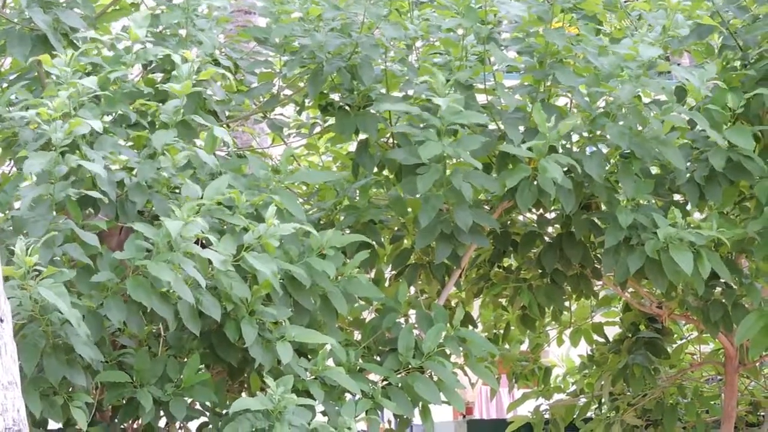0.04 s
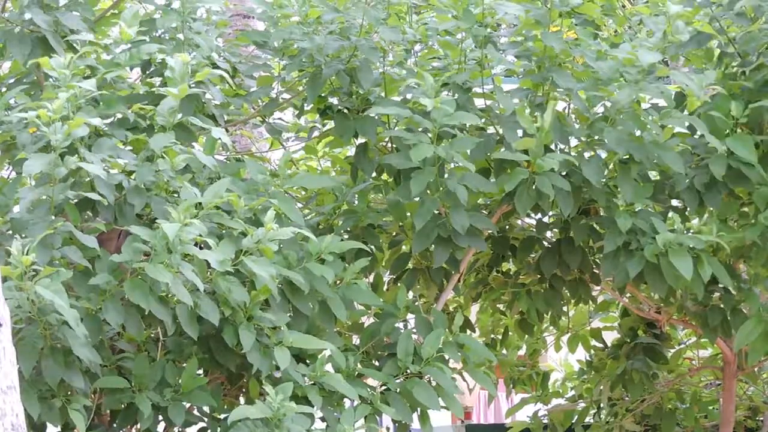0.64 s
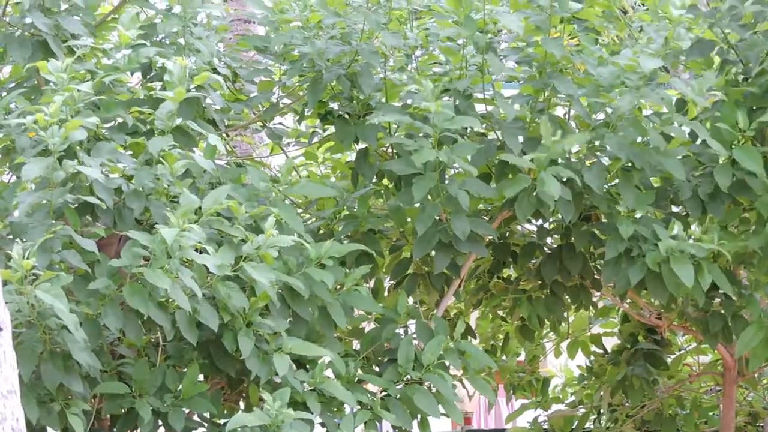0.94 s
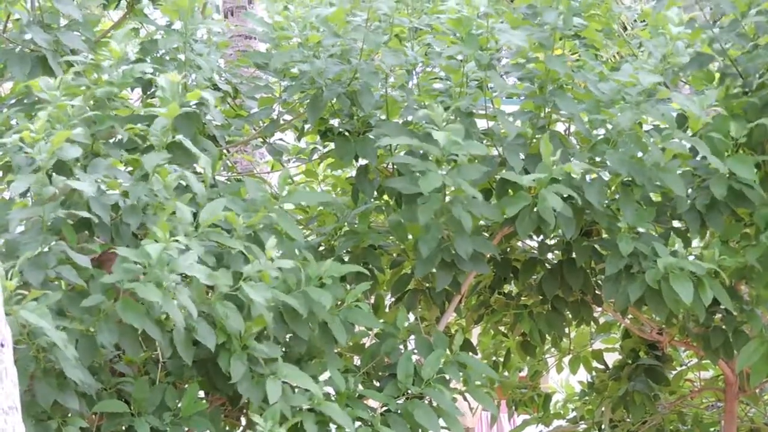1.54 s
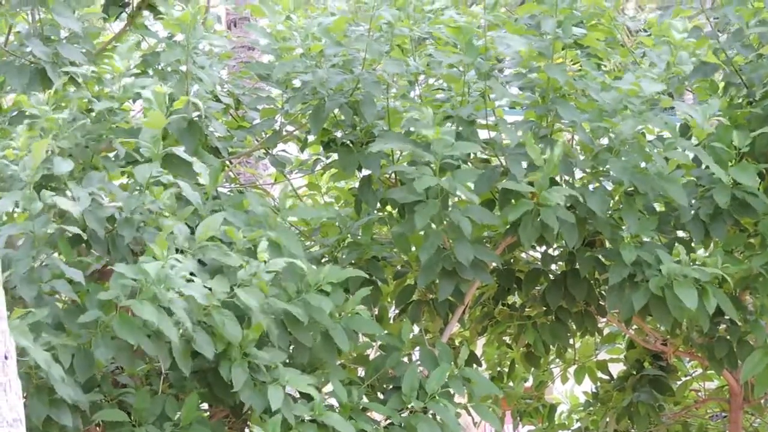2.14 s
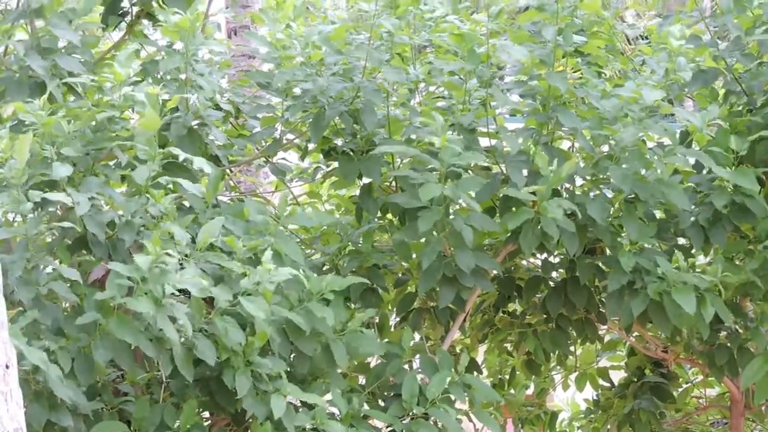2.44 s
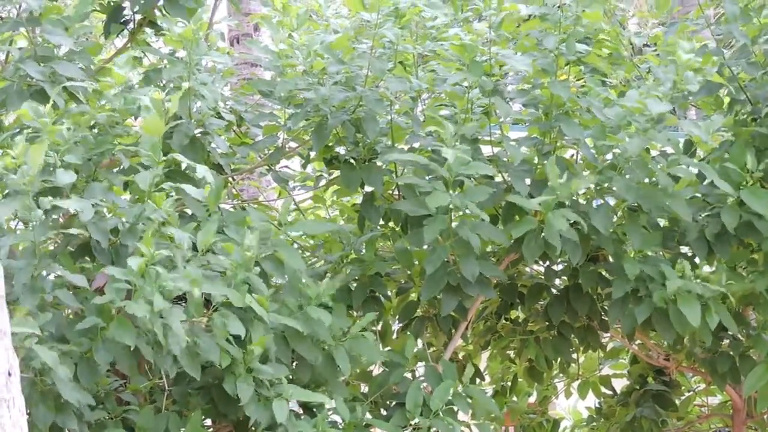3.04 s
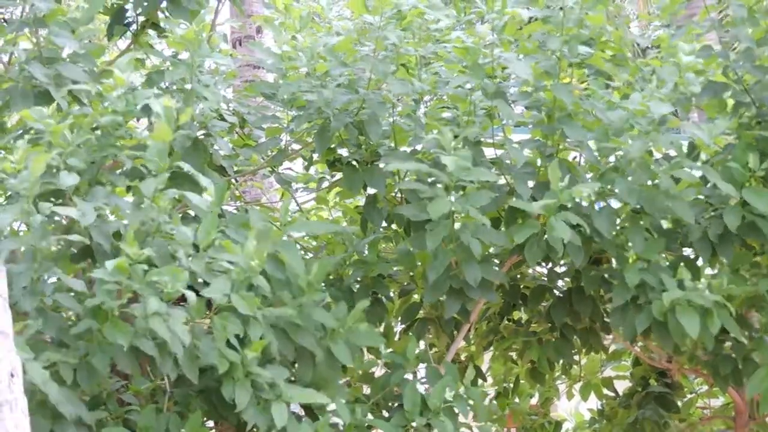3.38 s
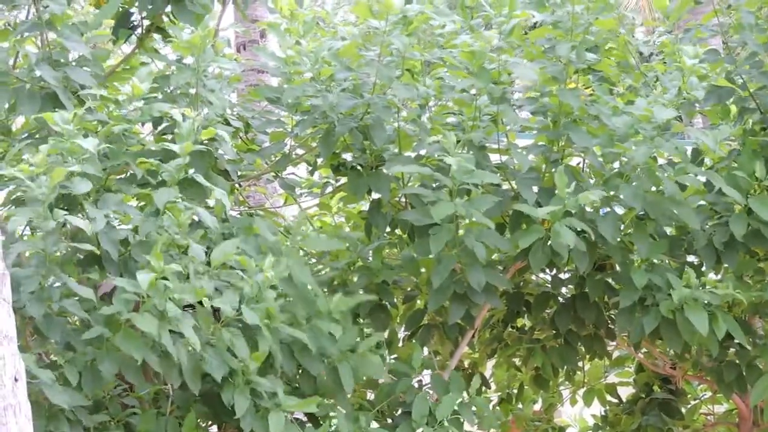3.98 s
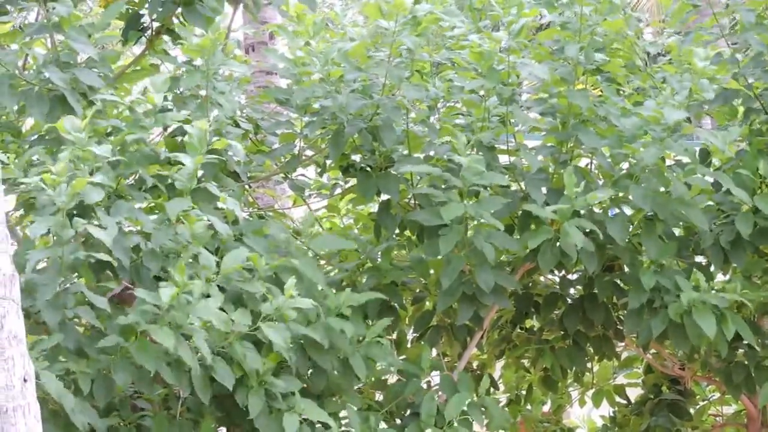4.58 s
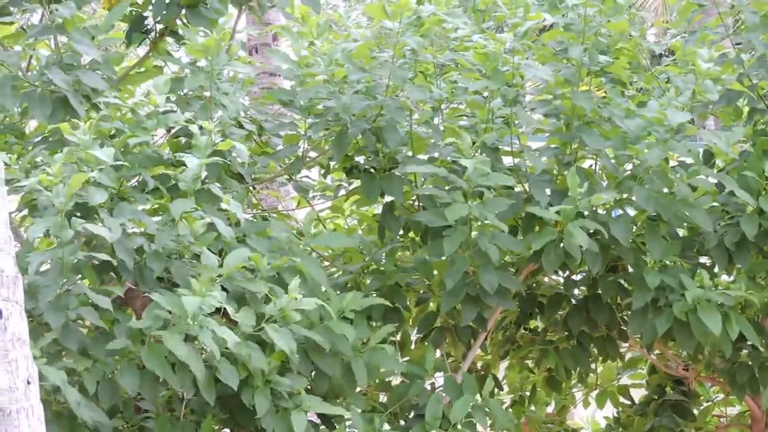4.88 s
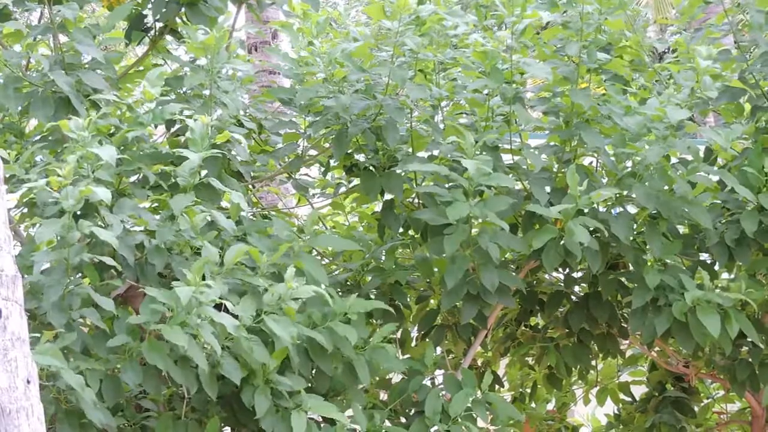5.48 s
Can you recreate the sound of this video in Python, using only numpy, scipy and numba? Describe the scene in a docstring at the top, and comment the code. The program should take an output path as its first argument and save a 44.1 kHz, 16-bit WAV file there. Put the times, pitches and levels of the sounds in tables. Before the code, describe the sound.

In a leafy garden, a soft wash of open air lies under uneven gusts that strike the microphone and build toward hard thumps. Thin, faint chirps and warbles come from the trees, followed by a short rustle of leaves and a few tiny twig taps. A soft whistling call repeats about four times a second, and a closer raspy squawk just begins as the sound ends.

```python
"""Gusts and birds in a garden

The microphone stands among shrubs. Turbulence rumbles on its two ports and single eddies thump them.
Leaves hiss and twigs tap in the breeze, over a steady wash of distant foliage and open air.
Small birds chirp and whistle in the trees, their calls scattered by trunks, leaves and walls.
At the very end a nearer bird starts a rasping squawk."""
import sys
import numpy as np
from scipy import signal
from scipy.fft import rfft, irfft
from scipy.io import wavfile
from scipy.ndimage import uniform_filter1d, minimum_filter1d, map_coordinates
from numba import njit

SR = 44100
rng = np.random.default_rng(int(sys.argv[2]) if len(sys.argv) > 2 else 0)


def generate_wav(signal):
    """Clip the signal to [-1, 1] and save it as 16-bit WAV at the path in sys.argv[1]."""
    frames = np.transpose(np.atleast_2d(signal))
    scaled = np.clip(frames, -1, 1) * 32767
    pcm = np.round(scaled).astype(np.int16)
    wavfile.write(sys.argv[1], SR, pcm)


N = 252252
T = np.arange(N) / SR

# The breeze on the ports, freshening late. Each row: time in seconds, left and right level in dB.
BREEZE = [(0, -51, -49.5), (1.2, -49.5, -48), (1.7, -46, -47.5), (2.15, -49.5, -48.5), (2.9, -44, -44),
          (3.25, -39, -39.5), (3.75, -41, -39.5), (4.22, -48, -44.5), (4.6, -34.5, -30), (5.15, -32, -33.5),
          (5.72, -48, -23.5)]
# Gusts riding on it. Each row: peak time and width in seconds, left and right level in dB.
GUSTS = [(.53, 0.064, -46, -45), (0.712, 0.054, -42, -46), (1.042, .04, -48, -38.5),
         (1.33, 0.019, -37.5, -43), (2.262, 0.061, -35, -44), (2.413, 0.056, -30, -40.5),
         (2.536, 0.072, -26.5, -34), (2.757, 0.054, -36.5, -34.5), (3.066, .06, -36, -35.5),
         (3.384, 0.068, -49, -27.5), (3.599, 0.074, -29, -32), (3.838, 0.033, -32, -42),
         (4.04, .045, -37.5, -40), (4.444, 0.09, -35, -34), (4.816, 0.11, -52, -25),
         (4.958, 0.035, -38, -19), (5.35, 0.087, -33.5, -20), (5.499, 0.058, -28, -15.5),
         (5.71, 0.037, -30.5, -28)]
# The distant background. Each row: frequency in Hz, relative level in dB.
AIR_COLOUR = [(59, -40), (100, 0), (134, -7), (214, -4.5), (253, -7.5), (287, -7), (438, -13), (808, -14),
              (879, -12.5), (998, -17), (2000, -16), (3460, -18), (8410, -22), (12600, -25.5), (15500, -39)]
# Its lean to one side. Each row: frequency in Hz, left minus right in dB.
AIR_PAN = [(60, -4), (110, 1), (200, 0), (380, 0.0), (700, 5), (1290, 3.5), (2380, -2), (4400, 0),
           (8120, -3), (15000, -0.5)]
# Bird note contours by name. Each row: share of the note, pitch ratio, level offset in dB.
NOTE_SHAPES = { "tick": [(0, 1.1, 1), (.3, 1.05, -2), (.7, .96, -0.5), (1, 0.895, -4)],
               "flick": [(0, .99, -3), (.27, 1.09, 0), (.52, 1, 0), (.8, .895, -0.5), (1, 0.9, -5)],
               "pip": [(0, 0.96, -4), (.25, 1, 0), (1, .99, -2)], "arch": [(0, .84, -10), (.3, .945, -5),
               (.65, 1, -1), (1, 1.005, -5)], "rise": [(0, .88, -6), (.4, .97, -0.5), (1, 1.12, -4)],
               "slur": [(0, .97, -6), (.25, 1.015, -1), (.5, .98, -2), (.62, .935, -6), (.82, .885, -3),
               (1, 0.85, -6)], "whistle": [(0, 1.11, -6), (.1, 1.045, 0.5), (.2, 1.005, -1), (.55, 1, -1),
               (.8, 1, -3.5), (1, .998, -4)], "drop": [(0, 1.33, -7), (.35, 1.1, -3), (.72, .92, -1),
               (1, 0.764, -6.5)], "warble": [(0, 1.06, -4), (.35, .93, -2), (.65, 1.03, -3.5),
               (1, 1.13, -0.5)], }
# A tiny bird's thin notes. Each row: start and length in seconds, pitch in Hz, level in dB, contour.
THIN_NOTES = [(1.372, 0.055, 6350, -65, "pip"), (1.6, .03, 6200, -63, "pip"),
              (1.892, 0.021, 8440, -51.5, "pip"), (2.287, 0.043, 8260, -54, "arch"),
              (2.539, 0.044, 8290, -54, "arch"), (2.598, .032, 8150, -60, "pip")]
# Its hoarse chips. Each row: start and length in seconds, pitch in Hz, level in dB.
CHIPS = [(2.374, 0.031, 6930, -50), (2.634, 0.031, 7050, -49), (2.635, .035, 5280, -55)]
# A far bird's falling slurs.
# Each row: start and length in seconds, pitch in Hz, level in dB, waver as a share of the pitch.
SLURS = [(1.383, .1, 3740, -57, .012), (3.683, .115, 3735, -55.5, 0.014)]
# A far warbler. Each row: start and length in seconds, pitch in Hz, level in dB, contour.
WARBLER_NOTES = [(2.325, 0.033, 1950, -56.5, "pip"), (2.388, 0.035, 2220, -56, "rise"),
                 (2.585, .042, 2424, -56.5, "rise"), (2.734, 0.074, 2560, -57, "warble"),
                 (2.786, 0.024, 3240, -53, "tick"), (2.884, 0.092, 2600, -55.5, "warble"),
                 (2.915, .085, 1340, -63, "rise"), (3.033, 0.0244, 1950, -53.5, "tick"),
                 (3.035, 0.041, 3290, -60, "tick"), (3.099, 0.036, 2400, -57, "rise"),
                 (3.32, .03, 1830, -58.5, "rise"), (3.43, .066, 2550, -59.5, "warble")]
# The hardest eddies to strike the microphone.
# Each row: peak time in seconds, port (0 left, 1 right), level in dB, pitch in Hz, width in seconds.
EDDIES = [(2.258, 0, -21.5, 34.2, 0.018), (2.403, 0, -19.5, 61.5, 0.0044), (2.495, 0, -14, 106, 0.0058),
          (2.537, 0, -19, 45, 0.0063), (2.54, 0, -19.5, 183, 0.0042), (3.361, 1, -22.5, 121, 0.0061),
          (3.391, 1, -19, 77, 0.011), (3.549, 0, -15, 51, 0.008), (3.595, 0, -14, 38, 0.0063),
          (3.599, 0, -22, 225, 0.003), (3.612, 0, -17, 114, 0.0063), (3.837, 0, -22.5, 45.3, 0.0093),
          (4.445, 1, -18.5, 45.1, 0.0066), (4.518, 1, -21, 69.4, 0.013), (4.744, 1, -14, 120, 0.0042),
          (4.958, 1, -18, 285, 0.0033), (4.963, 1, -5, 70, 0.0077), (4.964, 1, -24, 694, 0.00095),
          (4.992, 1, -16.5, 92, 0.011), (5.194, 1, -22.5, 191, 0.0054), (5.267, 1, -20.5, 151, 0.0048),
          (5.315, 1, -20, 275, 0.0032), (5.331, 1, -23, 130, 0.0038), (5.376, 1, -9.5, 111, 0.0078),
          (5.38, 1, -22.5, 296, 0.0035), (5.435, 1, -27, 288, 0.0041), (5.455, 1, -15, 120, 0.0038),
          (5.48, 1, 1.5, 256, .0015), (5.488, 1, 1.5, 196, 0.005), (5.489, 1, -25, 500, .005),
          (5.508, 1, -18, 390, 0.0055), (5.523, 1, -12.5, 300, 0.002), (5.553, 1, -27, 314, 0.0066),
          (5.582, 1, -6, 151, 0.0024), (5.657, 1, -6, 265, 0.0013), (5.664, 1, -14, 80, 0.0067)]
# Branches swing and brush their leaves. Each row: peak time and width in seconds, hiss level in dB.
SWAYS = [(2.755, 0.05, -56.5), (2.85, 0.069, -59.5), (3.055, 0.042, -54), (3.15, 0.051, -54.5),
         (3.358, 0.03, -55.5), (3.487, 0.032, -55.5), (3.685, 0.066, -60), (3.98, .05, -63.5)]
# The leaf hiss. Each row: frequency in Hz, relative level in dB.
LEAF_COLOUR = [(1500, -8.5), (4000, -7.5), (7000, -6), (10500, 0), (13000, -4), (15500, -15)]
# Twigs touching. Each row: start in seconds, level in dB, pitch in Hz, decay time in seconds.
TWIG_TAPS = [(2.967, -46, 4800, .003), (4.27, -59, 9000, .012), (4.432, -49.5, 730, 0.03),
             (4.432, -57, 4770, 0.023), (4.58, -56.5, 740, 0.046), (5.306, -54.5, 770, 0.04)]
# A two-note caller's quick low drops. Each row: start in seconds, level in dB.
DROPS = [(3.81, -61.5), (4.079, -54.5), (4.347, -55), (4.61, -53.5), (4.873, -53.5), (5.152, -57),
         (5.443, -55)]
# Its held whistles. Each row: start and length in seconds, pitch in Hz, level in dB.
WHISTLES = [(4.003, 0.17, 2920, -59), (4.266, 0.15, 2830, -58.5), (4.53, .125, 2868, -58),
            (4.792, 0.11, 2775, -59), (5.084, 0.1, 2830, -58.5), (5.368, 0.068, 2916, -58)]
# The near bird's buzz. Each row: time in seconds, pitch in Hz, level in dB.
SQUAWK_BUZZ = [(5.585, 276.7, -72), (5.61, 279, -55.5), (5.635, 280, -48), (5.67, 286.2, -44),
               (5.72, 287, -44)]
# Its throat resonances. Each row: centre in Hz, half bandwidth of a filter stage in Hz, gain in dB.
SQUAWK_THROAT = [(1950, 120, -4), (2300, 100, 0), (2680, 200, 7)]
# The tone from the other side of its syrinx. Each row: time in seconds, pitch in Hz, level in dB.
SQUAWK_TONE = [(5.64, 2690, -74), (5.67, 2725, -48), (5.72, 2780, -43)]


def undb(db):
    """Decibels to gain."""
    return 10 ** (np.asarray(db) / 20)


def unit(x):
    """Scale to rms 1."""
    return x / np.sqrt(np.mean(x ** 2))


def pan(db):
    """Left and right gains for a level difference; positive is to the left."""
    return undb(np.array([[.5], [-.5]]) * db)


def place(x, pan_db):
    """Sound from one side is louder on that port and reaches it a few samples sooner."""
    lag = 2 * int(np.clip(round(pan_db), -3, 3))
    return np.array([np.roll(x, max(-lag, 0)), np.roll(x, max(lag, 0))]) * pan(pan_db)


def curves(table, at=T):
    """The columns of a table, joined by straight lines along the first."""
    times, *columns = np.transpose(table)
    return [np.interp(at, times, column) for column in columns]


def at_hz(table, hz):
    """Read (Hz, value) points on a log-frequency axis."""
    f, value = np.transpose(table)
    return np.interp(np.log(np.maximum(hz, 1)), np.log(f), value)


def equalise(x, gain):
    """Filter by a gain given as a function of frequency."""
    hz = np.arange(N + 1) * SR / (2 * N)
    return irfft(rfft(x, 2 * N) * gain(hz))[..., :N]


def walk(rate):
    """A smooth random wander of rms 1, with rate new values a second."""
    hold = max(int(SR / rate), 1)
    steps = np.repeat(rng.standard_normal(N // hold + 1), hold)
    return unit(uniform_filter1d(uniform_filter1d(steps, hold), hold)[:N])


def swell(peak_s, width_s, fall=1):
    """Gain that builds to 1 at peak_s and dies away, fall times as slowly."""
    age = (T - peak_s) / width_s
    return 1 / np.cosh(np.clip(np.where(age < 0, age, age / fall), -20, 20))


def resonance(x, hz, width):
    """Two-pole band-pass, gain 1 at the centre."""
    return signal.lfilter(*signal.iirpeak(hz, hz / width, fs=SR), x)


@njit
def lowpass(x, hz, damping):
    """State-variable low-pass with a moving corner."""
    low, band_state, low_state = np.empty(len(x)), 0., 0.
    for i in range(len(x)):
        g = np.tan(np.pi * hz[i] / SR)
        band = (band_state + g * (x[i] - low_state)) / (1 + g * (g + damping))
        low[i] = low_state + g * band
        band_state, low_state = 2 * band - band_state, 2 * low[i] - low_state
    return low


def airflow():
    """Wind level in dB on each port: the gusts add their power to the breeze."""
    power = undb(curves(BREEZE)) ** 2
    for peak_s, width_s, left_db, right_db in GUSTS:
        gust = undb([[left_db], [right_db]]) * swell(peak_s, width_s) ** 2
        power += gust ** 2
    return 10 * np.log10(power)


def turbulence(level_db, knee_hz=55, port_hz=12, edge_db=-38):
    """Rumble on one port: faster air sheds smaller eddies, so it brightens and loses its deepest bass."""
    octaves = (level_db + 30) / 25 + .25 * walk(45)
    top_hz = np.clip(140 * 2 ** octaves, 25, 900)
    bottom_hz = np.minimum(30 * 2 ** ((level_db + 38) / 10), top_hz)
    # Big eddies carry most of the energy; the microphone passes no steady pressure.
    cascade = equalise(rng.standard_normal(N), lambda f: f / np.hypot(f, port_hz) / np.hypot(f, knee_hz))
    cascade -= lowpass(cascade, bottom_hz, damping=2.26)
    broad = lowpass(cascade, top_hz, np.sqrt(2))
    rumble = lowpass(broad, top_hz, np.sqrt(2)) + undb(edge_db) * broad
    running_rms = np.sqrt(uniform_filter1d(rumble ** 2, size=3500))
    return rumble / running_rms * undb(level_db - 1)


def open_air(level_db=-52, alike_hz=600):
    """Distant foliage and open air: a soft hiss whose lows are alike on both ports."""
    def colour(f):
        return undb(at_hz(AIR_COLOUR, f)) / np.hypot(f, alike_hz)
    common = equalise(rng.standard_normal(N), lambda f: colour(f) * alike_hz)
    apart = equalise(rng.standard_normal((2, N)), lambda f: colour(f) * f)
    hiss = unit(equalise(common + apart, lambda f: pan(at_hz(AIR_PAN, f))))
    drift_db = .2 * walk(4) + .3 * walk(18)
    return hiss * undb(level_db + drift_db)


def garden_scatter(x, low_t60=.6, treble_t60=.65, delay_s=.0043, level_db=-2.5):
    """Trunks, leaves and walls scatter a call into a short diffuse tail; moving leaves blur its pitch."""
    age = T[:SR]
    echoes = rng.standard_normal((2, SR)) * (age > delay_s)
    low = signal.sosfiltfilt(signal.butter(2, 5000, fs=SR, output="sos"), echoes)
    tail = low * undb(-60 * age / low_t60) + (echoes - low) * undb(-60 * age / treble_t60)
    tail *= undb(level_db) / np.sqrt(np.sum(tail ** 2, axis=1, keepdims=True))
    wet = signal.fftconvolve(x, tail, axes=1)[:, :N]
    return np.array([map_coordinates(side, [np.arange(N) + 1.3 * walk(500)], order=3, mode="nearest")
                     for side in wet])


def sing(notes, pan_db, direct_db, waver, flutter_db=2):
    """Gliding tones from the trees: contours bend each pitch and level; direct_db sets the direct path."""
    song = np.zeros(N)
    wobble = 1 + waver * walk(400)
    flutter = undb(flutter_db * walk(90))
    for start, length, hz, db, contour in notes:
        span = np.flatnonzero((T >= start) & (T < start + length))
        ratio, contour_db = curves(NOTE_SHAPES[contour], (T[span] - start) / length)
        tone = np.sqrt(2) * np.sin(2 * np.pi * np.cumsum(hz * ratio * wobble[span]) / SR)
        envelope = signal.windows.tukey(len(span), .2) * undb(db + contour_db)
        song[span] += tone * flutter[span] * envelope
    placed = place(song, pan_db)
    return undb(direct_db) * placed + garden_scatter(placed)


def tiny_bird(trill_start_s=1.931, gap_s=.0435, tick_s=.015, tick_hz=7400, step=.93, tick_db=-45.5):
    """A very high voice to the right: clear upward notes, answered by a falling trill or a hoarse chip."""
    trill = [(trill_start_s + k * gap_s, tick_s, tick_hz * step ** k, tick_db, "flick") for k in range(3)]
    chips = [(*row, "pip") for row in CHIPS]
    return (sing(THIN_NOTES, pan_db=-8, direct_db=-1.5, waver=.0055)
            + sing(trill, pan_db=-4, direct_db=-3.5, waver=.018, flutter_db=1)
            + sing(chips, pan_db=-4, direct_db=-6.5, waver=.04))


def far_birds():
    """Two birds further off: one steps downward in a slur, one warbles deep in the foliage."""
    slurs = sum(sing([(*note, "slur")], pan_db=1, direct_db=-3, waver=waver) for *note, waver in SLURS)
    return slurs + sing(WARBLER_NOTES, pan_db=2.5, direct_db=-2.5, waver=.02)


def chatter(count=12, db=-60.5):
    """Stray syllables from the back of the garden, so far off that the scatter outweighs the direct call."""
    # Each row: start and length in seconds, pitch in Hz.
    syllables = rng.uniform(low=(1.5, .0337, 1400), high=(3.7, .0776, 2886), size=(count, 3))
    notes = [(*row, db, "warble") for row in syllables]
    return sing(notes, pan_db=0, direct_db=-4.5, waver=.0327)


def eddies(fine_hz=230):
    """Each eddy briefly swings the pressure on one port and breaks up into finer swirls."""
    thumps = np.zeros((2, N))
    noise = rng.standard_normal(N)
    for peak_s, port, db, hz, width_s in EDDIES:
        span = np.flatnonzero(abs(T - peak_s) < 10 * width_s)
        age = T[span] - peak_s
        band = signal.butter(2, [(hz + fine_hz) / 2, hz + fine_hz], "bandpass", fs=SR, output="sos")
        swirls = unit(signal.sosfilt(band, noise[span]))
        swirl_db = -26.5 + 5.5 * np.log2(hz / 100)  # smaller eddies break up more
        swing = np.cos(2 * np.pi * hz * age) + undb(swirl_db) * swirls
        thumps[int(port), span] += undb(db) * swing / np.cosh(1.69 * age / width_s)
    return thumps


def leaves(flutter_db=1, pan_db=-7):
    """To the right, countless tiny leaf contacts merge into a hiss that surges as the branches sway."""
    power = sum((undb(db) * swell(peak_s, width_s, fall=2.1)) ** 2 for peak_s, width_s, db in SWAYS)
    contacts = rng.standard_normal((2, N)) * np.exp(.3 * rng.standard_normal((2, N)))
    hiss = unit(equalise(contacts, lambda f: undb(at_hz(LEAF_COLOUR, f))))
    return hiss * np.sqrt(power) * undb(flutter_db * walk(40)) * pan(pan_db)


def twigs():
    """Small dry taps and scrapes as branches touch, alike on both ports."""
    taps = np.zeros(N)
    for start, db, hz, decay_s in TWIG_TAPS:
        scrape = unit(resonance(rng.standard_normal(N), hz, hz / 2))
        taps += scrape * undb(db) * (T >= start) * np.exp(-abs(T - start) / decay_s)
    return taps


def two_note_caller(onset_s=.035, onset_ratio=1.17, drop_s=.035, drop_hz=1698):
    """A bird to the left slides breathily into a steady whistle, then drops, about four times a second."""
    whistles = [(*row, "whistle") for row in WHISTLES]
    onsets = [(start - onset_s / 2, onset_s, hz * onset_ratio, db - 1.5, "tick")
              for start, _, hz, db in WHISTLES]
    drops = [(start, drop_s, drop_hz, db, "drop") for start, db in DROPS]
    return (sing(whistles, pan_db=3, direct_db=5.5, waver=.0057, flutter_db=1.5)
            + sing(onsets, pan_db=2, direct_db=-2, waver=.05)
            + sing(drops, pan_db=3, direct_db=2, waver=.035, flutter_db=1))


def squawk(jitter=.01, rasp=.62, pan_db=5):
    """Near left: one side of the syrinx buzzes breathily through the throat; the other adds a clashing tone."""
    def throat(x):
        return unit(sum(undb(db) * resonance(resonance(x, hz, 2 * half), hz, 2 * half)
                        for hz, half, db in SQUAWK_THROAT))
    def rough_phase(hz):
        return 2 * np.pi * np.cumsum(hz * (1 + jitter * walk(500)[span])) / SR
    span = np.flatnonzero(T > SQUAWK_BUZZ[0][0])
    buzz_hz, buzz_db = curves(SQUAWK_BUZZ, T[span])
    tone_hz, tone_db = curves(SQUAWK_TONE, T[span])
    phase = rough_phase(buzz_hz)
    buzz = throat(sum(np.sin(harmonic * phase) for harmonic in range(5, 14)))
    breath = rasp * throat(rng.standard_normal(N)[span])
    tone = np.sqrt(2) * np.sin(rough_phase(tone_hz))
    call = np.zeros((2, N))
    call[:, span] = place((buzz + breath) * undb(buzz_db) + tone * undb(tone_db), pan_db)
    return call


def scene():
    """Wind acts on each port separately; everything else arrives through the garden air."""
    rumble = np.array([turbulence(db) for db in airflow()])
    near_bird = squawk()
    birds = two_note_caller() + tiny_bird() + far_birds() + chatter()
    birds += near_bird + garden_scatter(near_bird)
    return rumble + eddies() + open_air() + leaves() + twigs() + birds


def record(dry, ceiling=.99, top_hz=15700):
    """Behind the microphone, a smooth limiter holds down the hardest thumps and the top is cut."""
    needed_gain = 1 / np.maximum(abs(dry) / ceiling, 1)
    held_gain = minimum_filter1d(needed_gain, size=601)
    gain = uniform_filter1d(uniform_filter1d(held_gain, size=301), size=301)
    return signal.sosfilt(signal.ellip(8, .1, 60, top_hz, fs=SR, output="sos"), dry * gain)


dry = scene()
out = record(dry)
generate_wav(out)
```